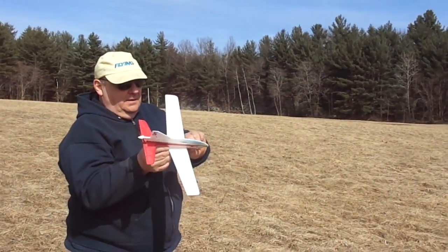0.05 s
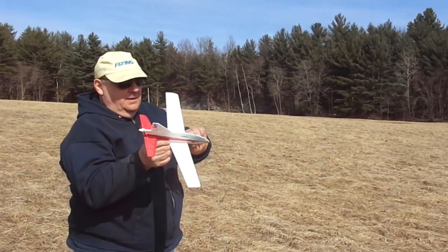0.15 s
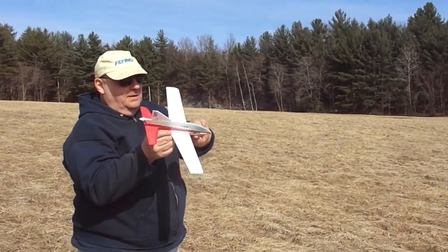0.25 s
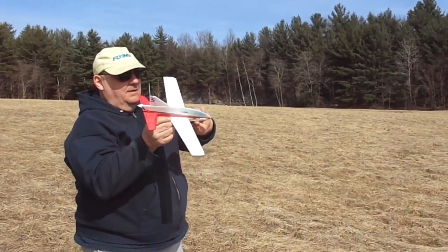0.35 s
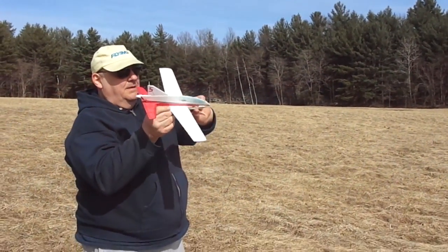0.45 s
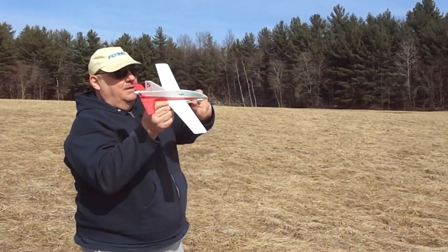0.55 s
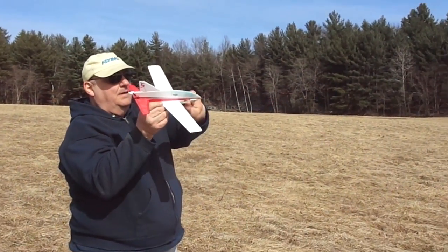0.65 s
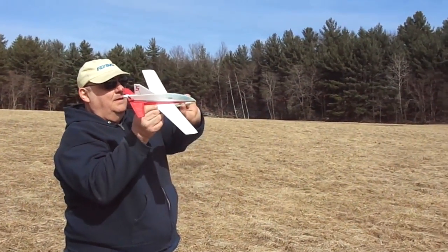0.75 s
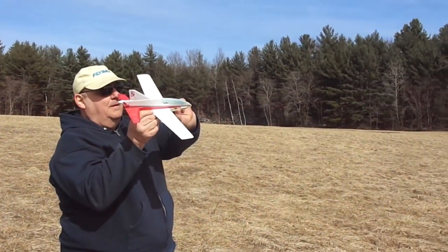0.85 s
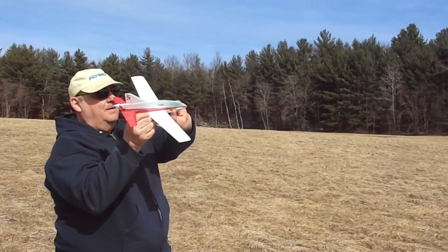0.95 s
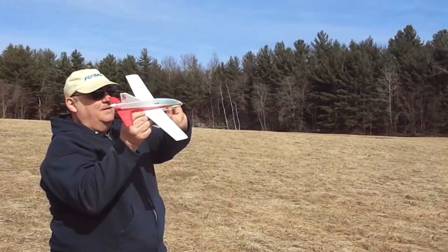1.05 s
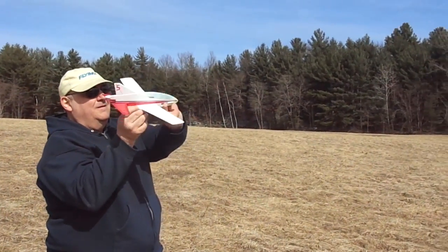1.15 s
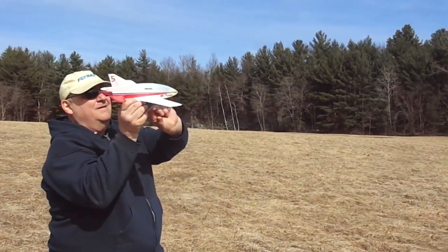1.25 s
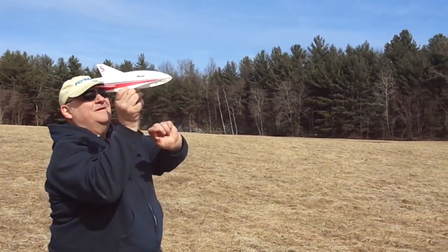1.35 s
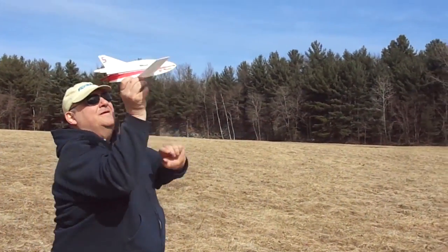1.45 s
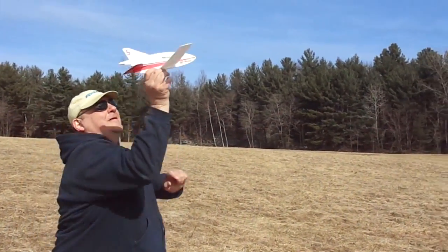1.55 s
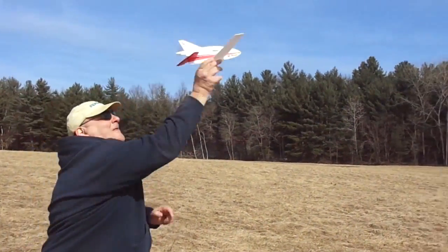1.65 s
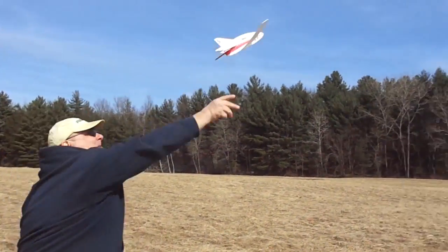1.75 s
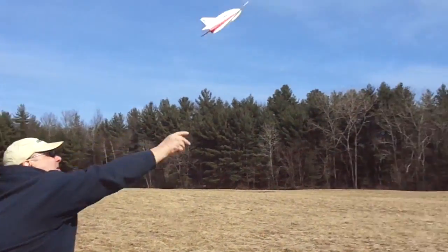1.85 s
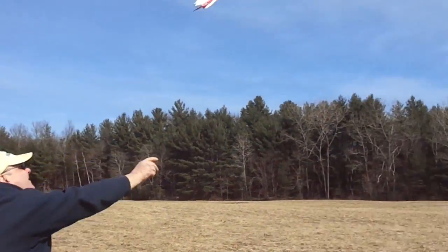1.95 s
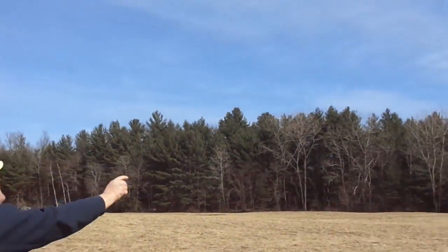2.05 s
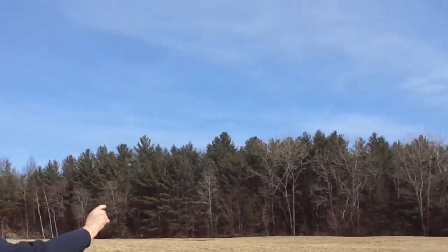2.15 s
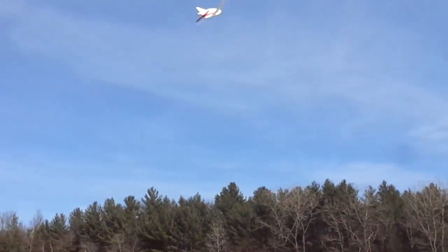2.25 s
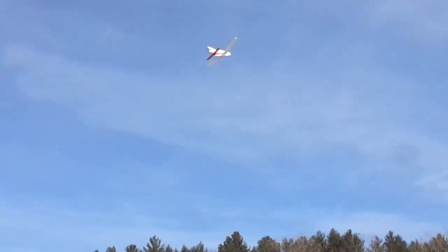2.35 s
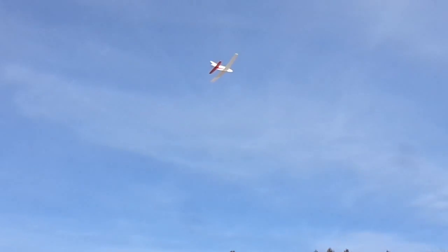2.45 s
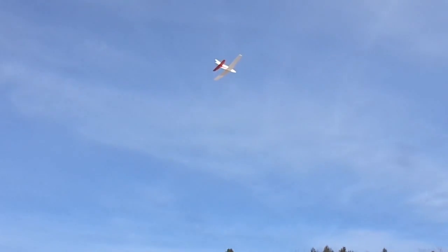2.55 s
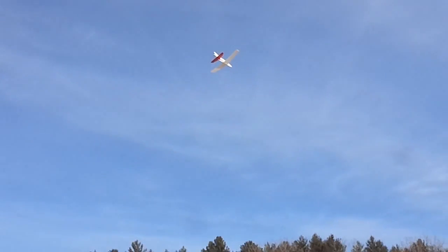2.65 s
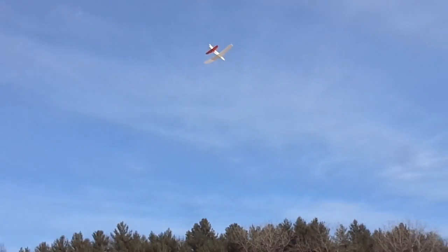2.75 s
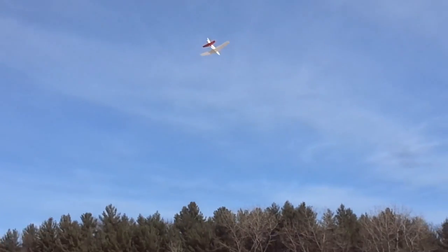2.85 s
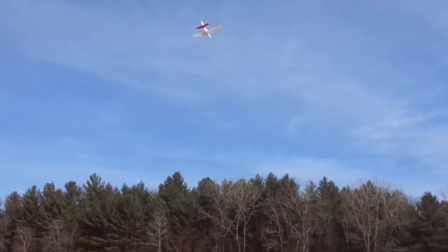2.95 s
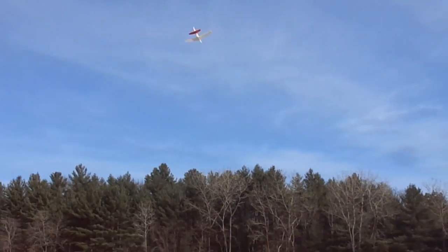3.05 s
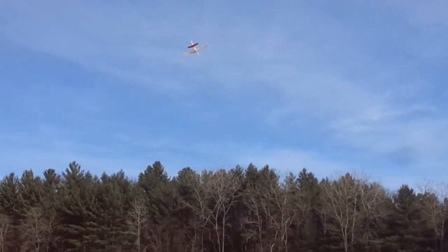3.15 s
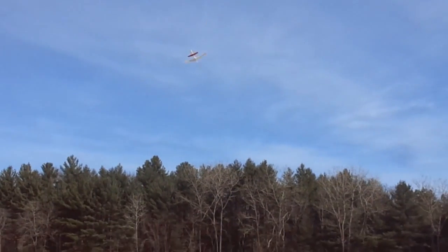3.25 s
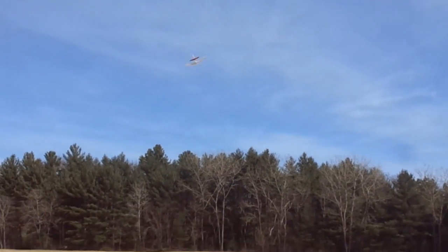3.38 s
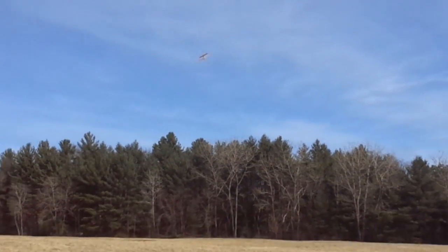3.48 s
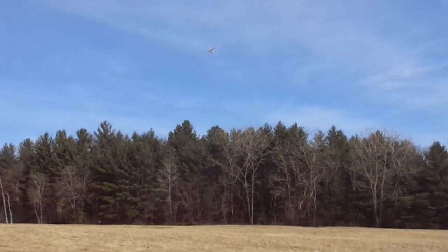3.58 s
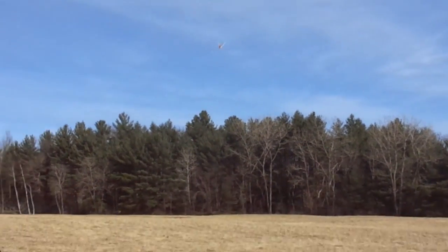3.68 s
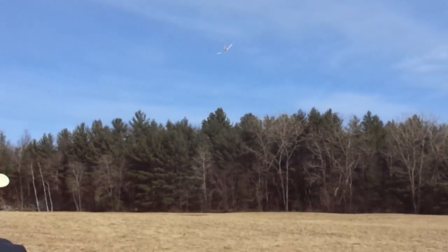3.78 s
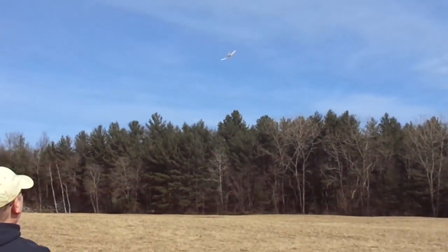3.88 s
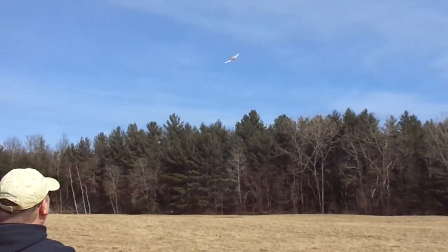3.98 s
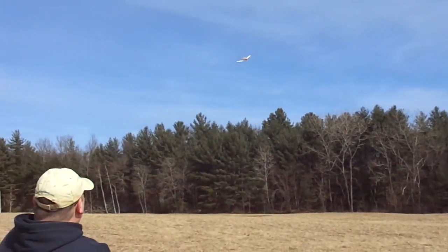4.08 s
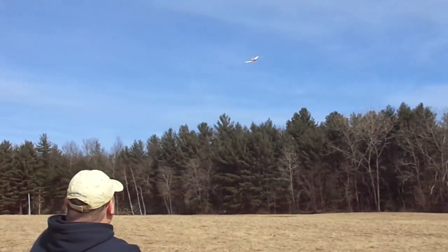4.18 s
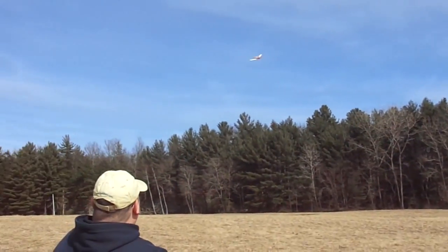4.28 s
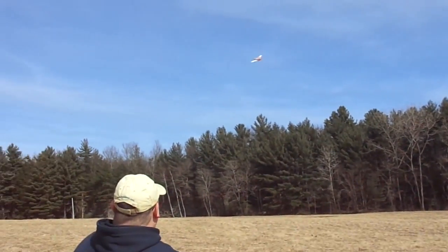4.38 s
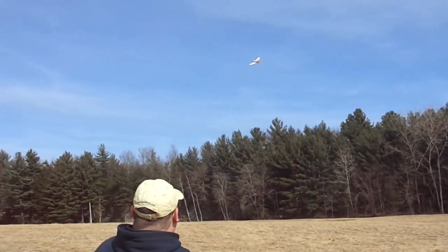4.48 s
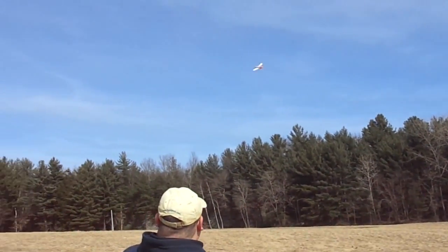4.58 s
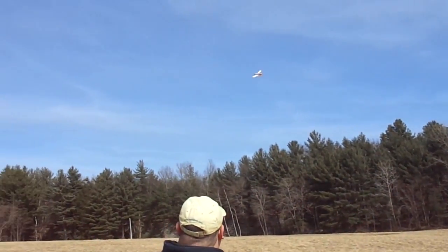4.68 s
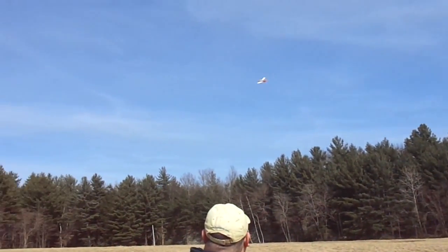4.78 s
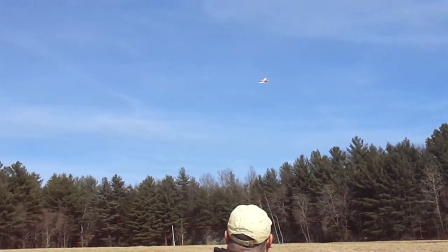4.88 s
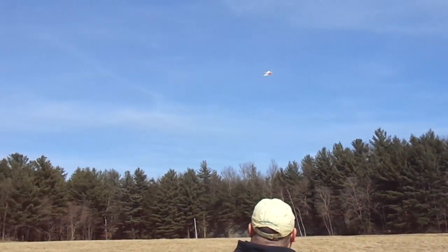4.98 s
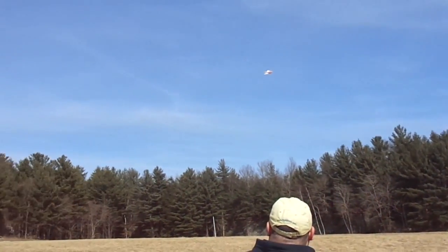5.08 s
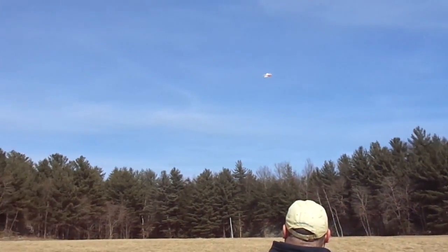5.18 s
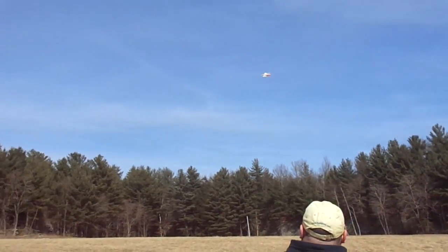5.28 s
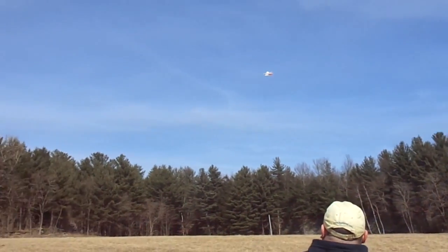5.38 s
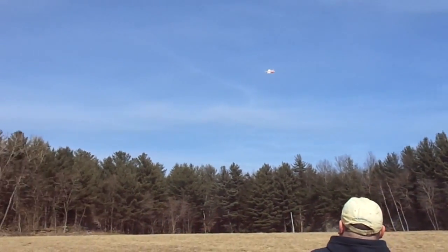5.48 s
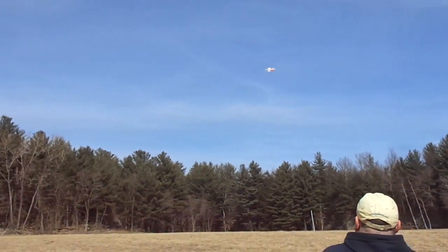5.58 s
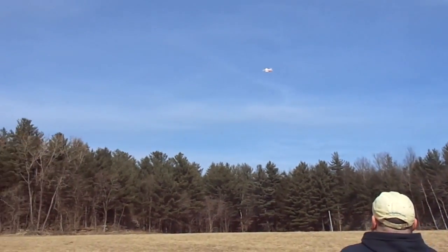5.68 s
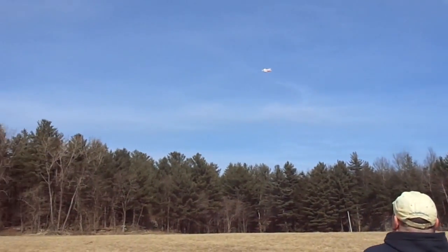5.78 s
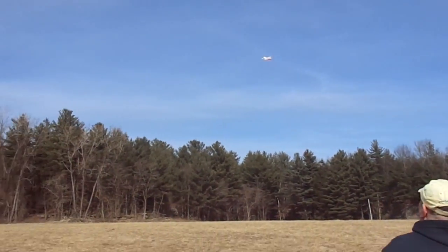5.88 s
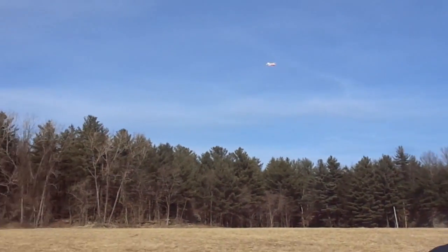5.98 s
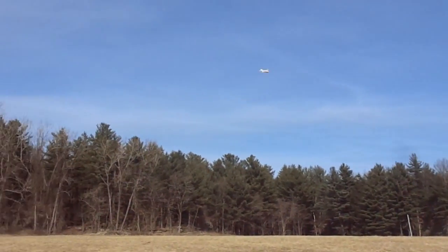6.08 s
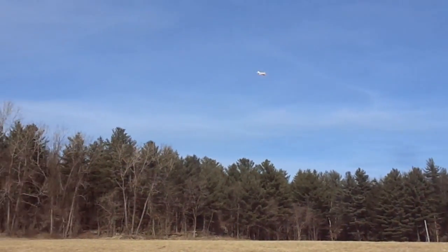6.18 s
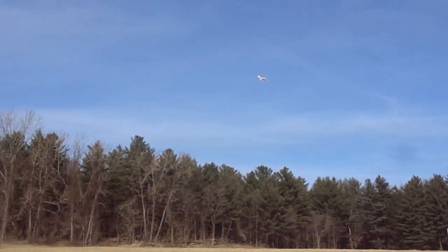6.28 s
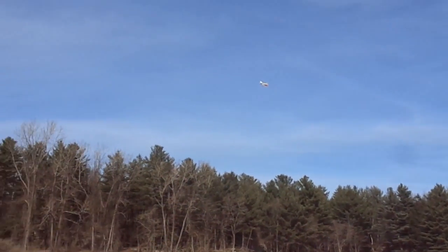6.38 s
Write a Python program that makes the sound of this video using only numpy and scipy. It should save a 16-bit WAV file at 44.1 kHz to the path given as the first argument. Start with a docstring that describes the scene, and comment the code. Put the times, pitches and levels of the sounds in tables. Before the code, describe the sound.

After a plastic click, a model plane's motor whirs up close and flies away, its high buzz wavering over gusts of wind.

```python
"""A small electric model plane over a field. Trees murmur, a camera whines faintly and gusts buffet
the microphone throughout. At 1 s plastic clicks and the motor spins up in the hand: the propeller
sings on multiples of the shaft speed over a rasp of chopped air. The plane is thrown, climbs overhead
near 2.5 s and flies off, throbbing; its mix of tones follows the view (near, overhead, far).
A second click comes at 6.3 s."""
import sys
import numpy as np
from scipy import signal
from scipy.fft import rfft, irfft, next_fast_len
from scipy.io import wavfile
from scipy.ndimage import uniform_filter1d

SR = 44100
rng = np.random.default_rng(int(sys.argv[2]) if len(sys.argv) > 2 else 0)


def to_wav(s):
    """Save 16-bit WAV."""
    ch = np.atleast_2d(s).T  # columns
    pcm = np.round(np.clip(ch, -1, 1) * 32767)  # PCM
    wavfile.write(sys.argv[1], SR, pcm.astype(np.int16))


N = 283563
TIME_S = np.arange(N) / SR
FFT_SIZE = next_fast_len(N, real=True)
FREQ_HZ = np.fft.rfftfreq(FFT_SIZE, 1 / SR)

# wind in the trees: freq_hz, relative_db
TREE_SPECTRUM = [(120, -33), (200, -11), (303, -14), (397, -10), (775, -6.5), (963, -1.5), (1750, -3.5),
                 (3010, -13), (6530, -20.5), (11600, -20.5), (12500, -19), (13200, -20), (15000, -22)]
# swells of that wind: centre_s, gain_db, half_length_s
TREE_SURGES = [(0, 3.5, .2), (.8, 3, 0.25)]
# wind on the microphone: freq_hz, relative_db
WIND_SPECTRUM = [(15, -17), (25, -8), (50, -1), (100, 3), (200, -1), (300, -6), (420, -11.5), (560, -18),
                 (900, -36), (2000, -80)]
# gusts: start_s, length_s, relative_db
WIND_GUSTS = [(.04, 0.14, -46), (.73, 0.06, -36), (.85, .21, -32.5), (1.1, 0.38, -40.5), (1.86, 0.49, -41),
              (2.06, .1, -31.5), (2.72, 0.14, -38.5), (3.13, 0.3, -35.5), (3.46, .22, -41),
              (3.71, 0.29, -39.5), (3.8, 0.063, -32), (4.21, 0.1, -45), (4.6, 0.14, -40.5),
              (4.89, 0.13, -43), (5.21, 0.11, -45.5), (5.44, 0.031, -45), (6.03, .06, -44)]
# strongest eddies: start_s, relative_db
WIND_BUFFETS = [(.754, -22), (.894, -23), (0.957, -19.5), (1.007, -20.5), (2.104, -23), (2.864, -21.5),
                (3.269, -16.5), (3.298, -18), (3.313, -14), (3.395, -18.5), (3.454, -23.5), (3.747, -16.5),
                (3.817, -11.5), (3.843, -18), (3.954, -21), (4.628, -25.5), (5.468, -25), (6.07, -23.5),
                (6.214, -26.5)]
# plastic ticks: start_s, peak_db, decay_s, main_ring_hz, upper_ring_hz
PLASTIC_CLICKS = [(1.025, -23.5, 0.0053, 4000, 11200), (6.31, -15, .0018, 5900, 8400)]
# a faint ring, then two whistles of the climb: start_s, length_s, level_db, first_hz, last_hz, width_hz
WHISTLE_BANDS = [(-.05, 0.19, -53.5, 1650, 1620, 120), (1.63, 0.26, -32.5, 8550, 8050, 260),
                 (2.926, 0.16, -49.5, 1005, 1000, 21.7)]

# running speed, lifted by the throw, sinking with distance; scaled by the spin-up: time_s, shaft_hz
SHAFT_SPEED = [(1.33, 288), (1.6, 284.5), (1.635, 289), (1.75, 288.2), (2.0, 282.8), (2.15, 282),
               (2.4, 277.7), (3.2, 279.2), (4.05, 274.3), (4.35, 269), (5.05, 269.7), (5.25, 267),
               (5.9, 264.6), (6.2, 265), (6.43, 260)]
# view of the plane: time_s, view (0 near, 1 overhead, 2 and above far)
PLANE_VIEW = [(1.0, 0), (2.0, 0.07), (2.5, 1.33), (3.8, 0.05), (4.4, 4), (5.2, 1.89), (6.43, 2.5)]
# relative loudness; the tones follow the rasp: time_s, rasp_db, hiss_db
PLANE_LEVELS = [(1.25, -24.5, -29.5), (1.35, -23.5, -29), (1.55, -24, -27.1), (1.8, -24.5, -26.5),
                (2.15, -29.5, -31), (2.45, -31.5, -31), (2.9, -35.5, -34.3), (3.4, -42, -43),
                (3.72, -49.5, -45), (4.05, -43.5, -39.5), (4.35, -39.5, -41.5), (4.8, -38.5, -41.5),
                (5.3, -40, -44.7), (5.8, -39, -44.3), (6.2, -39.5, -46.5)]
# brief dips and swells of the plane: centre_s, gain_db, half_length_s
PLANE_SWELLS = [(4.423, -9, 0.0073), (4.443, 2.5, 0.0059), (6.187, -4, 0.0072), (6.265, -1.5, .0078),
                (6.328, 1, 0.0058), (6.42, 5, .04)]
# throbs, slow (drive) or quick (airframe): start_s, length_s, first_hz, last_hz, weight, pull_turns
THROB_SPELLS = [(1.188, 0.15, 13, 50.3, 0.68, 0.018), (2.101, .7, 50.5, 48.2, 0.45, 0.012),
                (2.84, 0.68, 50, 52.5, 0, 0.0017), (3.62, 0.71, 49, 55.4, 0.66, 0.018),
                (4.27, 0.86, 53, 52.8, 0.2, 0.0062), (4.299, 1.98, 31.5, 38.11, 0.62, 0.019),
                (6.005, 0.38, 26, 26.8, 0.6, 0.027)]
# colour of the chopped air: freq_hz, near_db, overhead_db, far_db
AIR_SPECTRA = [(393, -19, -28, -19), (755, -17.5, -14, -20), (846, -2.5, -4.5, -0.5),
               (1034, -9.5, -8.5, -10), (1315, 3.5, -8.5, 2), (1590, -4, -10, -10), (2120, 2.5, -7.5, -0.5),
               (2840, 0, 1, 0.5), (3550, -3, -6.5, -6.5), (4230, -5.5, -7.5, -9), (6600, -11, -10, -15),
               (7700, -10.5, -7, -13.5), (12200, -10.5, -9.5, -17)]
# turbulence at the blades: time_s, roughness (0-1)
BLADE_TURBULENCE = [(1.27, 0.54), (1.35, 0.08), (3.6, 0.04), (4.3, 0.28), (6.43, 0.39)]
# propeller tones against the rasp: shaft_order -> near_db, overhead_db, far_db
TONE_LEVELS = {2: (-24.5, -29.5, -23.5), 3: (-3.3, -10, -12.5), 4: (-20.5, -24.5, -22),
               5: (-1.8, -10, -2.5), 6: (-20.5, -14, -24.5), 7: (-1.9, -14, -13.5),
               8: (-10.5, -20.5, -14.5), 9: (-10.5, -9.5, -15.5), 10: (-15, -7.5, -15),
               11: (-17.5, -23, -16), 12: (-16, -40, -15), 13: (-13, -11.5, -18), 14: (-16.5, -18, -15),
               15: (-17, -21, -36), 17: (-19, -27, -30)}
# single propeller tones briefly swell or fade: shaft_order -> centre_s, gain_db, half_length_s
TONE_SWELLS = {3: [(1.72, 5, 0.074), (2.82, -10, 0.069), (3.07, 3.5, 0.098), (3.3, -9, .05),
               (3.57, 6, 0.13), (3.9, -9, 0.12)], 4: [(1.16, 27.5, 0.047)], 5: [(1.18, 7, 0.035),
               (1.48, 2.5, .12), (1.85, -2.5, 0.23), (2.88, 5, 0.049), (3.45, -9, 0.24), (3.76, 6.5, 0.11),
               (4.4, -5, 0.35), (5.33, 7, 0.35)], 6: [(2.8, 6, .06)], 7: [(1.48, 3.5, 0.16),
               (1.73, -10, 0.089), (6.17, 7.5, 0.12)], 8: [(1.48, 5, .13)], 10: [(3.35, 7, 0.37)]}

MOTOR_START_S, SPIN_UP_S, SPIN_UP_POWER = 1.02, 0.28, 0.39
AIR_DB_PER_OCTAVE, TONE_EXTRA_DB_PER_OCTAVE = 16.5, 15  # per octave of shaft speed
STALL_S, STALL_RISE_S, STALL_FALL_S, STALL_RASP_DB, STALL_HISS_DB = 1.196, 0.067, 0.019, 10.5, 14.5


def gain_of(db):
    """Decibels to amplitude."""
    return 10 ** (np.asarray(db) / 20)


def unit_rms(x):
    """Scales to rms 1."""
    return x / np.sqrt(np.mean(abs(x) ** 2) + 1e-20)


def curves(rows):
    """Table columns, interpolated over time."""
    times_s, *columns = np.transpose(rows)
    return [np.interp(TIME_S, times_s, column) for column in columns]


def colour(points):
    """Gain per FFT bin from (freq_hz, gain_db) points."""
    freq_hz, gain_db = np.transpose(points)
    return gain_of(np.interp(np.log(FREQ_HZ + 1), np.log(freq_hz + 1), gain_db))


def filtered(x, gain):
    """Applies a gain per FFT bin."""
    return irfft(rfft(x, FFT_SIZE) * gain, FFT_SIZE)[:N]


def band_rms(x, low_hz, high_hz):
    """Rms within one band."""
    return np.std(filtered(x, (FREQ_HZ > low_hz) & (FREQ_HZ < high_hz)))


def drift(rate_hz):
    """Random wander of rms 1, up to about rate_hz."""
    grid_s = TIME_S[::32]
    freq_hz = np.fft.rfftfreq(len(grid_s), grid_s[1])
    spectrum = rfft(rng.standard_normal(len(grid_s))) / (1 + (freq_hz / rate_hz) ** 4)
    return np.interp(TIME_S, grid_s, unit_rms(irfft(spectrum, len(grid_s))))


def held(start_s, length_s, rise_s, fade_s):
    """Envelope: linear rise, hold, exponential fade."""
    age_s = TIME_S - start_s
    return np.clip(age_s / rise_s, 0, 1) * np.exp(-np.maximum(age_s - length_s, 0) / fade_s)


def bump(centre_s, half_length_s):
    """Bell curve of height 1."""
    return np.exp(-((TIME_S - centre_s) / half_length_s) ** 2)


def swells_db(rows):
    """Sum of bell-shaped level changes."""
    return sum(db * bump(centre_s, half_length_s) for centre_s, db, half_length_s in rows)


def trees(base_db=-56):
    """Wind in distant trees: a soft rush that swells and sinks."""
    rush = filtered(rng.standard_normal(N), colour(TREE_SPECTRUM))
    return gain_of(base_db + swells_db(TREE_SURGES)) * rush / band_rms(rush, 700, 4000)


def camera(pitch_hz=12272, waver_hz=22, level_db=-66.5):
    """Thin, wavering electronic whine."""
    cycles = np.cumsum(pitch_hz + waver_hz * drift(rate_hz=40)) / SR
    return gain_of(level_db) * np.sqrt(2) * np.sin(2 * np.pi * cycles)


def wind(lumpy_db=5.5, trim_db=-2, rumble_db=-59):
    """Lumpy pressure swings at the microphone: gusts over a breeze and a steady open-air rumble."""
    eddies = rng.standard_normal(N) * gain_of(lumpy_db * np.clip(drift(rate_hz=83), -2, 2))
    breeze = (0.74, 4.85, -51.5)  # start_s, length_s, relative_db
    power = sum((gain_of(db) * held(start_s, length_s, rise_s=0.021, fade_s=0.026)) ** 2
                for start_s, length_s, db in [*WIND_GUSTS, breeze])
    gusts = gain_of(trim_db) * np.sqrt(power) * unit_rms(filtered(eddies, colour(WIND_SPECTRUM)))
    rumble_colour = colour([(12, -6), (50, 1), (130, -5.5), (400, -19.5), (2000, -60)])
    rumble = filtered(rng.standard_normal(N), rumble_colour)
    return gusts + gain_of(rumble_db) * unit_rms(rumble)


def buffets(nominal_hz=270, sag_s=0.068, decay_s=0.0014, trim_db=-4.5):
    """Each strong eddy gives a dull thump of a cycle or two."""
    out = np.zeros(N)
    age_s = np.arange(SR // 16) / SR
    envelope = (age_s / decay_s) ** 3 * np.exp(-age_s / decay_s)
    for start_s, db in WIND_BUFFETS:
        onset_hz = nominal_hz * rng.uniform(0.7, 1.3)
        cycles = onset_hz * age_s / (1 + age_s / sag_s)
        thump = envelope * np.sin(2 * np.pi * (cycles + rng.random()))
        span = out[round(start_s * SR):][:len(thump)]
        span += gain_of(db + trim_db) * thump[:len(span)] / abs(thump).max()
    return out


def clicks(half_width_hz=700, broadband=0.25):
    """Plastic ticks: noise bursts through two resonances each."""
    out = np.zeros(N)
    for start_s, peak_db, decay_s, *rings_hz in PLASTIC_CLICKS:
        burst = rng.standard_normal(N) * (TIME_S >= start_s) * np.exp(-abs(TIME_S - start_s) / decay_s)
        rings = sum(1 / (1 + ((FREQ_HZ - hz) / half_width_hz) ** 2) for hz in rings_hz)
        tick = filtered(burst, rings + broadband)
        out += gain_of(peak_db) * tick / abs(tick).max()
    return out


def whistles():
    """Narrow bands of hiss, sinking slightly in pitch."""
    out = np.zeros(N)
    for start_s, length_s, db, first_hz, last_hz, width_hz in WHISTLE_BANDS:
        pitch_hz = np.interp(TIME_S, [start_s, start_s + length_s], [first_hz, last_hz])
        carrier = np.exp(2j * np.pi * np.cumsum(pitch_hz) / SR)
        band = (drift(width_hz) + 1j * drift(width_hz)) * carrier
        out += gain_of(db) * held(start_s, length_s, rise_s=0.046, fade_s=0.12) * band.real
    return out


def throbbing(wander=0.047):
    """Drive and airframe beats swing the loudness and pull the shaft ahead and back."""
    swing, pull_turns = np.zeros((2, N))
    for start_s, length_s, first_hz, last_hz, weight, turns in THROB_SPELLS:
        glide_hz = np.interp(TIME_S, [start_s, start_s + length_s], [first_hz, last_hz])
        rate_hz = glide_hz * (1 + wander * drift(rate_hz=7.7))
        beats = np.cumsum(rate_hz * (TIME_S > start_s)) / SR
        wave = held(start_s, length_s, rise_s=0.025, fade_s=0.025) * np.cos(2 * np.pi * beats)
        swing += weight * wave
        pull_turns += turns * wave
    return swing, pull_turns


def ripple(x, depth_db):
    """Random shifting peaks and notches that make the rush of air swirl."""
    frames = dict(nperseg=1024, noverlap=768)
    spectra = signal.stft(x, **frames)[2]
    patches = rng.standard_normal(spectra.shape)
    for _ in range(2):
        patches = uniform_filter1d(patches, size=6, axis=0)  # frequency
        patches = uniform_filter1d(patches, size=45, axis=1)  # time
    return signal.istft(spectra * gain_of(depth_db * unit_rms(patches)), **frames)[1][:N]


def chopped_air(turns, view, rasp_db, hiss_db, chop=0.17, wobble=0.035, split_hz=4500):
    """Noise pulsed by two blades: low rasp and high hiss, coloured by the view."""
    pulses = 1 + chop * np.cos(4 * np.pi * turns) + wobble * np.cos(2 * np.pi * turns)
    air = ripple(rng.standard_normal(N), depth_db=2.3) * pulses
    treble = 1 / (1 + (split_hz / (FREQ_HZ + 1)) ** 8)
    passband = 1 / (1 + (300 / (FREQ_HZ + 1)) ** 4) / (1 + (FREQ_HZ / 15500) ** 10)
    out = np.zeros(N)
    for view_index, rasp_trim_db in enumerate([-1, -2, -1]):
        spectrum = np.array(AIR_SPECTRA)[:, [0, view_index + 1]]
        rush = filtered(air, colour(spectrum) * passband)
        rasp = filtered(rush, 1 - treble) / band_rms(rush, 2100, 4000)
        hiss = filtered(rush, treble) / band_rms(rush, 5000, 14000)
        share = np.maximum(1 - abs(view - view_index), 0)
        out += share * (gain_of(rasp_db + rasp_trim_db) * rasp + gain_of(hiss_db + 0.25) * hiss)
    return out


def propeller(turns, view, level_db, skirt_hz=55, hum_db=-54.5):
    """Shaft orders with noise skirts from blade turbulence; the shaft itself hums after the throw."""
    roughness = curves(BLADE_TURBULENCE)[0]
    hum_envelope = held(start_s=1.615, length_s=1.07, rise_s=0.074, fade_s=0.06)
    out = gain_of(hum_db) * hum_envelope * np.cos(2 * np.pi * turns)
    for order, by_view_db in TONE_LEVELS.items():
        order_db = np.interp(view, range(3), by_view_db) + swells_db(TONE_SWELLS.get(order, []))
        phase_rad = 2 * np.pi * (order * turns + rng.random())
        tone = (1 + roughness * drift(skirt_hz)) * np.cos(phase_rad)
        tone += roughness * drift(skirt_hz) * np.sin(phase_rad)
        out += gain_of(level_db + order_db) * tone
    return np.sqrt(2) * out


def plane(jitter=0.00077, unsettled_db=-6.5, settle_s=0.064):
    """One shaft drives tones and air. The blades stall briefly in spin-up; the tones clear at speed."""
    running_s = TIME_S - MOTOR_START_S
    spin = np.clip(running_s / SPIN_UP_S, 1e-9, 1) ** SPIN_UP_POWER
    swing, pull_turns = throbbing()
    shaft_hz = spin * curves(SHAFT_SPEED)[0] * (1 + jitter * drift(rate_hz=21))
    turns = np.cumsum(shaft_hz) / SR + pull_turns
    view = np.clip(curves(PLANE_VIEW)[0], 0, 2)
    stall = bump(STALL_S, np.where(TIME_S < STALL_S, STALL_RISE_S, STALL_FALL_S))
    unsettled = np.clip(1 - (running_s - SPIN_UP_S) / settle_s, 0, 1)

    rasp_db, hiss_db = curves(PLANE_LEVELS) + AIR_DB_PER_OCTAVE * np.log2(spin)
    tones_db = rasp_db + TONE_EXTRA_DB_PER_OCTAVE * np.log2(spin)
    tones_db += unsettled_db * unsettled + STALL_RASP_DB * stall / 2
    tones = propeller(turns, view, tones_db)
    air = chopped_air(turns, view, rasp_db + STALL_RASP_DB * stall, hiss_db + STALL_HISS_DB * stall)
    sound = tones * (1 + 0.72 * swing) + air * (1 + 0.26 * swing)
    return sound * gain_of(swells_db(PLANE_SWELLS))


def scene():
    """All sources reach two close microphone ports alike."""
    mix = plane() + whistles() + wind() + buffets() + trees() + camera() + clicks()
    return np.array([mix, mix])


def record(dry, cutoff_hz=15120):
    """Low-pass band limit."""
    lowpass = signal.firwin(801, cutoff_hz, window=("kaiser", 9), fs=SR)
    return signal.oaconvolve(dry, lowpass[None], "same")


dry = scene()
out = record(dry)
to_wav(out)
```